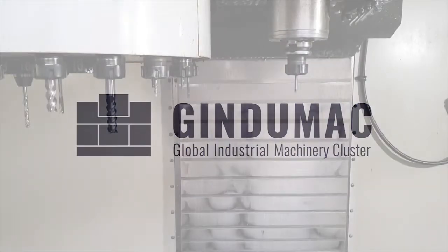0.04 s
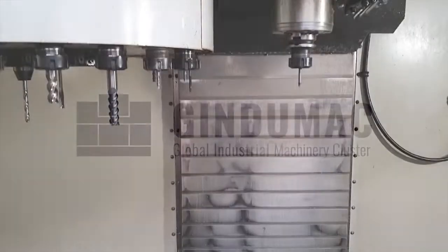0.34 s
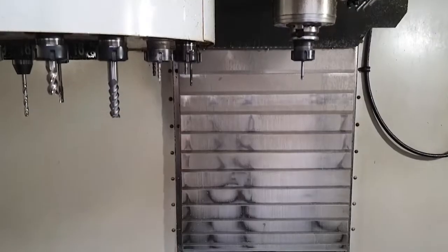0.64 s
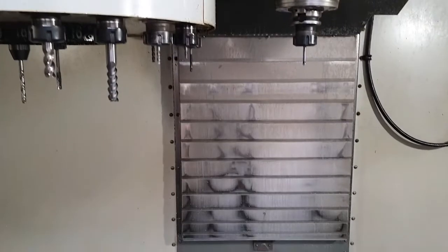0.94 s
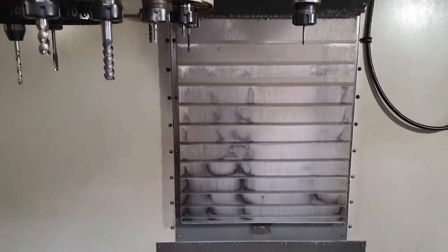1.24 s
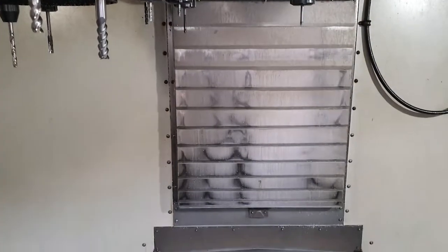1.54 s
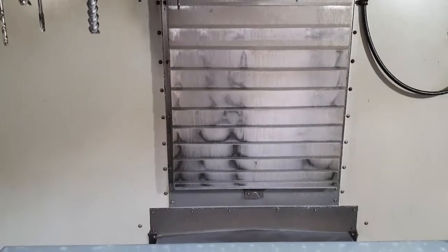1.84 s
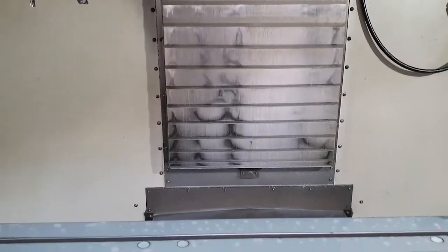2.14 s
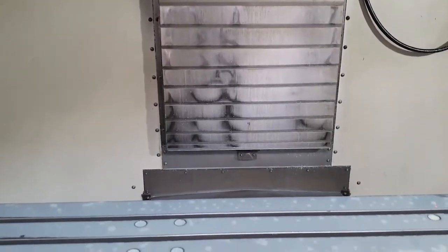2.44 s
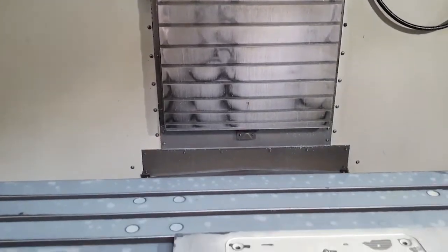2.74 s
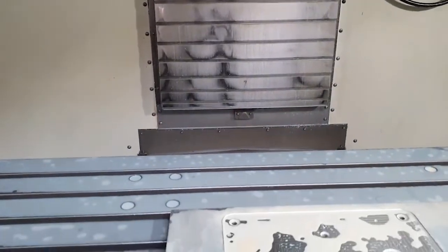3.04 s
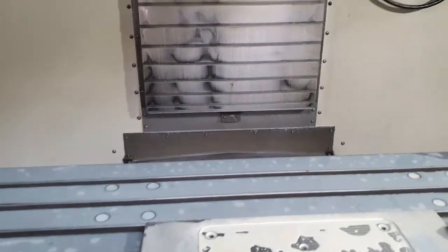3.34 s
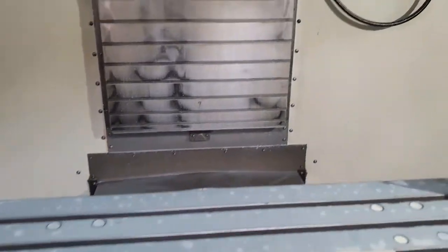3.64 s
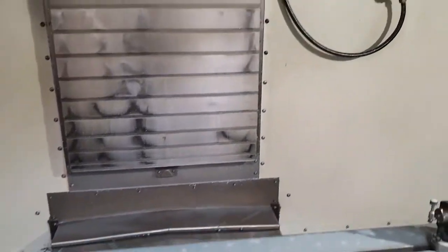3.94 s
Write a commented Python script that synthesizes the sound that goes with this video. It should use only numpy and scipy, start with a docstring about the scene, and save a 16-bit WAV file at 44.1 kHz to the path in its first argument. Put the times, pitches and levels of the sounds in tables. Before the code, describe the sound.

An idling machine tool hums steadily, fading in after a faint low bump. Pump and fan motors drone over a low rumble of air while a broad hiss swells and shifts, heard from inside its sheet-metal enclosure.

```python
"""Inside the sheet-metal enclosure of a machining centre, idling with its spindle still.
Pump and fan motors hum on steady, slowly beating tones over a low rumble of moving air.
A broad hiss, probably air and coolant, swells and changes colour; the walls add a short ring.
It all fades in after a faint low bump and is the same in both ears."""
import sys
import numpy as np
from scipy import signal
from scipy.fft import rfft, irfft
from scipy.io import wavfile
from scipy.ndimage import uniform_filter1d

SR = 44100
rng = np.random.default_rng(int(sys.argv[2]) if len(sys.argv) > 2 else 0)


def int16_out(signal):
    """Quantize to a 16-bit WAV file."""
    q = np.round(np.clip(np.atleast_2d(signal).T, -1, 1) * 32767)
    wavfile.write(sys.argv[1], SR, q.astype(np.int16))


N = 176400


def undb(db):
    """Decibels to gain."""
    return 10 ** (np.asarray(db) / 20)


def unit(x):
    """Scale to rms 1."""
    return x / np.sqrt(np.mean(x ** 2))


def wander(per_s):
    """Smooth random modulation: per_s steps a second, slewed twice; spread near 1."""
    hold = max(int(SR / per_s), 1)
    steps = np.repeat(rng.standard_normal(N)[:N // hold + 1], hold)
    return 1.31 * uniform_filter1d(uniform_filter1d(steps, hold), hold)[:N]


def equalise(x, curve):
    """Shape the spectrum along a curve of (freq_hz, gain_db) points."""
    freq_hz, gain_db = np.array(curve).T
    bins_hz = np.arange(N // 2 + 1) * SR / N
    return irfft(rfft(x) * undb(np.interp(np.log(bins_hz + 1), np.log(freq_hz), gain_db)), N)


def unit_band(x, low_hz, high_hz):
    """Isolate one band with steep, smooth crossovers and bring it near rms 1."""
    bins_hz = np.arange(N // 2 + 1) * SR / N
    crossover = 1 / (1 + (low_hz / (bins_hz + 1)) ** 12) / (1 + (bins_hz / high_hz) ** 12)
    bandpass = signal.butter(5, [low_hz, high_hz], "bandpass", fs=SR, output="sos")
    return irfft(rfft(x) * crossover, N) / np.std(signal.sosfilt(bandpass, x))


def enclosure(x):
    """Direct sound plus dense, quickly dying reflections from the metal walls."""
    t60_s, wet_db = 0.28, -11.5
    t = np.arange(SR // 2) / SR
    ring = rng.standard_normal(len(t)) * np.exp(-np.log(1000) * t / t60_s)
    return x + undb(wet_db) * signal.fftconvolve(x, ring / np.linalg.norm(ring))[:N]


def bump(t):
    """A faint, dull bump swells and stops short before the hum comes in."""
    # bass-heavy colour of the bump: freq_hz, gain_db
    bump_eq = [(20, -6), (45, -2), (80, -2), (150, -13.5), (300, -26.5), (700, -38), (2000, -38),
               (4000, -53), (9000, -67)]
    start_s, attack_s, end_s, release_s, level_db = 0.021, 0.058, 0.12, 0.004, -46.5
    attack = np.clip((t - start_s) / attack_s, 0, 1) ** 2
    release = np.clip((end_s - t) / release_s, 0, 1)
    return undb(level_db) * attack * release * unit(equalise(rng.standard_normal(N), bump_eq))


def fan_rumble():
    """Turbulent air from the fans: a low bed with a slight flutter."""
    # colour of the moving air: freq_hz, gain_db
    rumble_eq = [(20, -32), (35, -19), (60, -6), (85, -2.5), (110, 1.5), (140, -0.5), (200, -3), (270, -5),
                 (350, -2), (440, -0.5), (540, -5), (700, -7.5), (1200, -37)]
    level_db, flutter_db = -36, 0.33
    air = equalise(enclosure(rng.standard_normal(N)), rumble_eq)
    return unit(air) * undb(level_db + flutter_db * wander(per_s=10.3))


def hiss(t):
    """Rushing noise with fine spatter in it; five bands swell and flicker."""
    # colour of the hiss before each band is levelled: freq_hz, gain_db
    hiss_eq = [(400, -3), (600, -1), (700, -7), (790, -2.5), (920, -5.5), (1150, -3.5), (1500, -4),
               (2100, -0.5), (3000, -4.5), (4200, -7), (5000, -9), (5750, -9), (6300, -14.5), (7000, -19),
               (8000, -22.5), (9300, -22.5), (11000, -19.5), (13000, -23), (15700, -25)]
    # borders of the five bands: edge_hz
    edges_hz = [600, 1400, 2800, 4500, 7000, 16000]
    # swells of the four lower bands: time_s, low_db, mid_db, high_mid_db, presence_db
    lower_swells = [(0.25, -35, -30, -30.5, -33.5), (0.66, -40, -36.5, -36.0, -36.5),
                    (0.79, -43.5, -38.5, -35, -33), (0.99, -43, -35, -35.5, -37),
                    (1.07, -31, -30.0, -34, -36.5), (1.22, -34.5, -30, -34.5, -37),
                    (1.39, -36.5, -36.0, -38.5, -37.5), (1.6, -36.5, -30.5, -27, -31.5),
                    (1.66, -36.5, -32, -28.5, -34.0), (1.86, -38.5, -30, -26.5, -31.5),
                    (2.0, -31.5, -27, -31, -33.5), (2.25, -37.5, -34, -36, -37.5),
                    (2.59, -39, -35.0, -39.5, -37), (2.65, -36.5, -29.0, -34.5, -34.5),
                    (2.76, -34, -32.5, -32.5, -36), (2.85, -37.5, -31.5, -33.5, -34.5),
                    (3.0, -36.5, -33, -33, -34.5), (3.39, -40, -29, -30, -35), (3.56, -40, -30.5, -32, -34),
                    (3.97, -38.5, -33, -33.5, -35.0)]
    # swells of the top band: time_s, level_db
    treble_swells = [(0.25, -41), (0.67, -40.5), (0.75, -40), (0.97, -40), (1.03, -44.0), (1.38, -43.5),
                     (1.47, -40.0), (1.85, -37), (1.95, -42.5), (2.26, -41.5), (2.46, -43.5), (2.8, -42.5),
                     (2.93, -40), (3.22, -43.5), (3.46, -40.5), (3.55, -42), (3.64, -38), (3.73, -42),
                     (3.82, -38), (3.9, -42.5)]
    spatter_per_s, spatter_db = 2500, -12.5
    flicker_per_s, band_flicker_db, shared_flicker_db = 35, 1, 0.09
    spatter = (rng.random(N) < spatter_per_s / SR) * rng.standard_normal(N)
    spray = rng.standard_normal(N) + undb(spatter_db) * unit(spatter)
    rush = equalise(enclosure(spray), hiss_eq)
    time_s, *lower_db = np.array(lower_swells).T
    envelopes_db = [np.interp(t, time_s, level_db) for level_db in lower_db]
    envelopes_db.append(np.interp(t, *np.array(treble_swells).T))
    shared_db = shared_flicker_db * wander(flicker_per_s)
    out = 0
    for low_hz, high_hz, envelope_db in zip(edges_hz, edges_hz[1:], envelopes_db):
        flicker_db = shared_db + band_flicker_db * wander(flicker_per_s)
        out = out + unit_band(rush, low_hz, high_hz) * undb(envelope_db + flicker_db)
    return out


def motor_hum(t):
    """Pump and fan motors: each tone drifts a little with speed and wavers in strength and phase."""
    # motor tones: pitch_hz, level_db (rms), waver (share of the amplitude)
    tones = [(40.8, -57, .3), (59.6, -60.5, .25), (75.8, -56.5, 0.28), (92.6, -49, 0.43), (99.6, -50, 0.3),
             (117.2, -52.5, 0.31), (165.8, -37, 0.13), (233.5, -50.5, 0.83), (298.5, -52.5, 0.36),
             (326.1, -43, 0.064), (342.6, -28.5, 0.019), (377, -44.5, 0.16), (408.2, -35.5, 0.17),
             (424, -54, .4), (586, -51, 0.48), (679, -57, 0.45), (763, -51, 0.55), (1142, -48, 0.66),
             (5174.5, -60, .4)]
    drift_share, drift_per_s, waver_per_s = 0.000614, 1.944, 4.93
    hum = 0
    for pitch_hz, level_db, waver in tones:
        drift_s = drift_share * np.cumsum(wander(drift_per_s)) / SR
        cycles = pitch_hz * (t + drift_s) + rng.random()
        sway = 1 + waver * (wander(waver_per_s) + 1j * wander(waver_per_s))
        hum = hum + undb(level_db) * unit(np.real(sway * np.exp(2j * np.pi * cycles)))
    return hum


def scene():
    """After the bump, motors, fans and hiss fade in together, dead centre."""
    gate_opens_s, fade_from_s, fade_to_s = 0.156, 0.1, 0.74
    t = np.arange(N) / SR
    fade_in = (t > gate_opens_s) * np.clip((t - fade_from_s) / (fade_to_s - fade_from_s), 0, 1)
    mono = fade_in * (motor_hum(t) + fan_rumble() + hiss(t)) + bump(t)
    return np.array([mono, mono])


def record(dry):
    """A steep low-pass takes off the very top."""
    cutoff_hz = 15750
    return signal.sosfilt(signal.ellip(12, .1, 90, cutoff_hz, fs=SR, output="sos"), dry)


dry = scene()
out = record(dry)
int16_out(out)
```